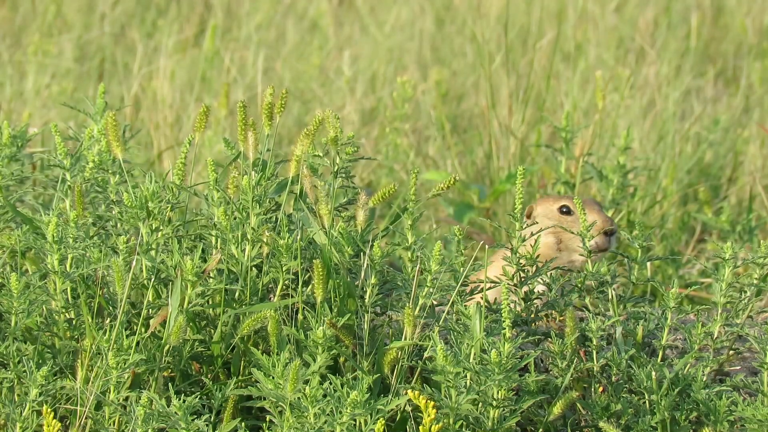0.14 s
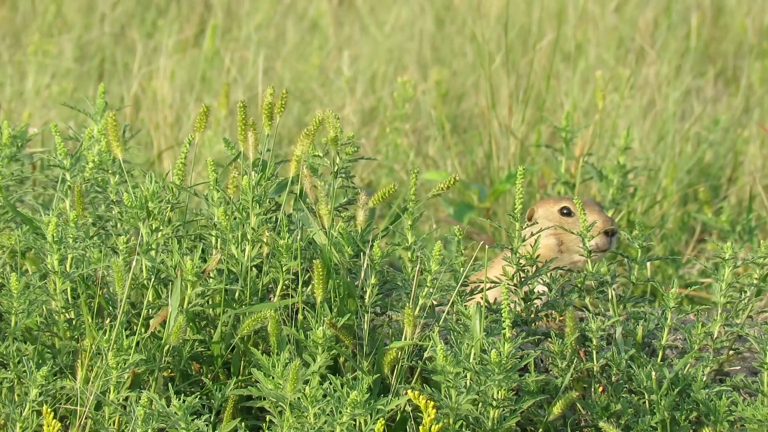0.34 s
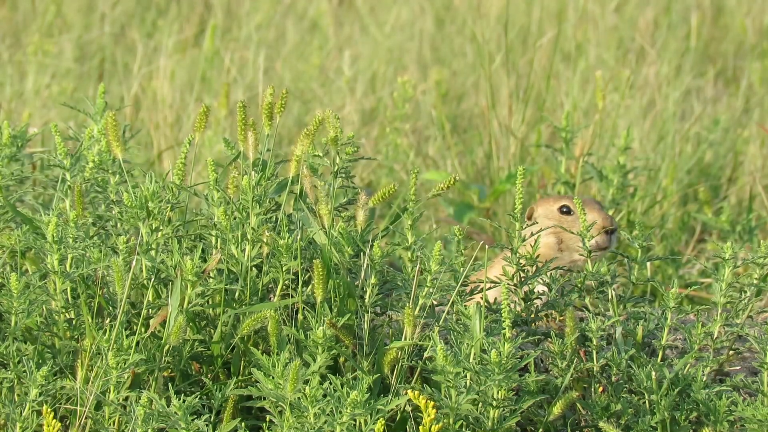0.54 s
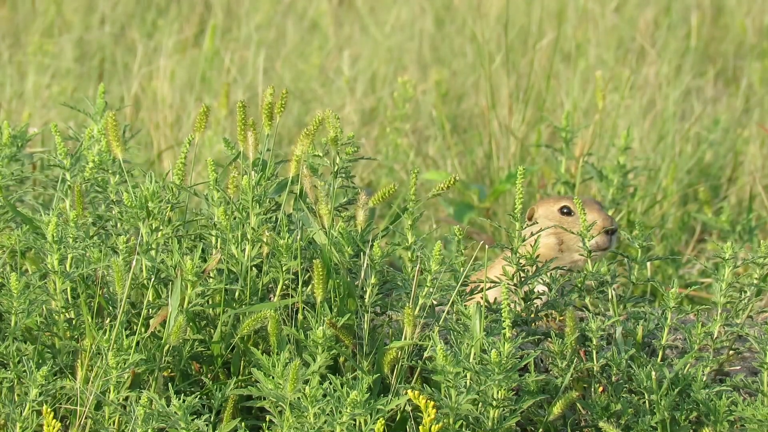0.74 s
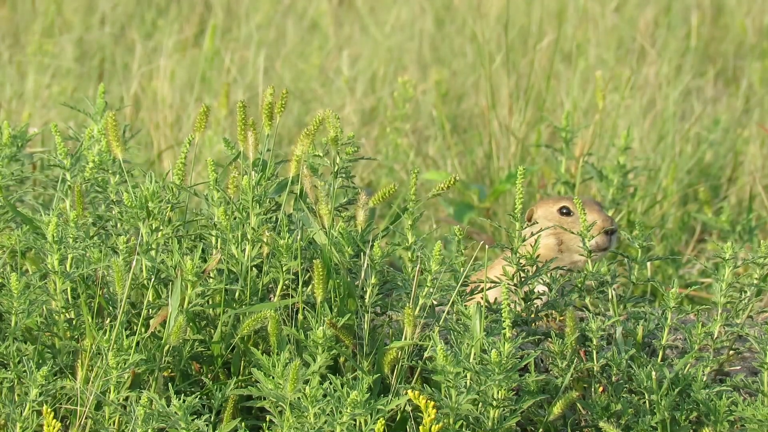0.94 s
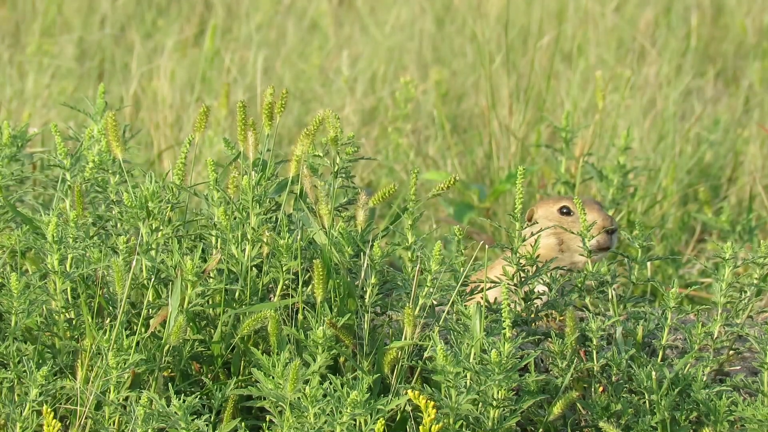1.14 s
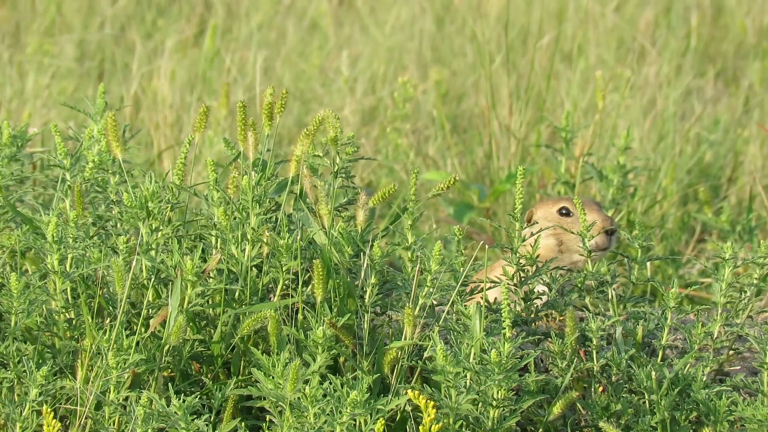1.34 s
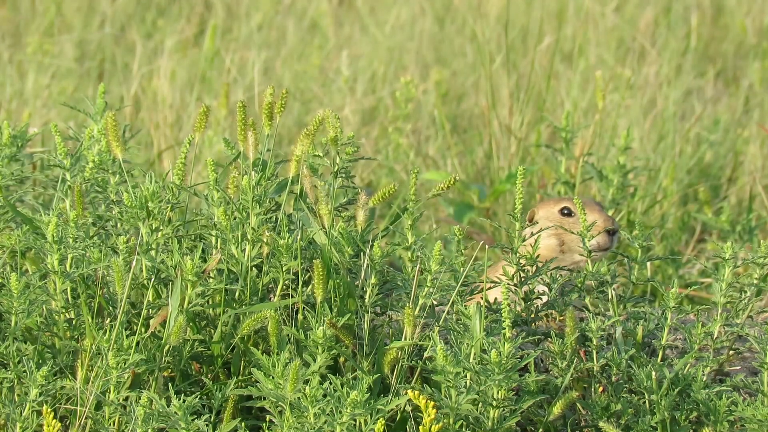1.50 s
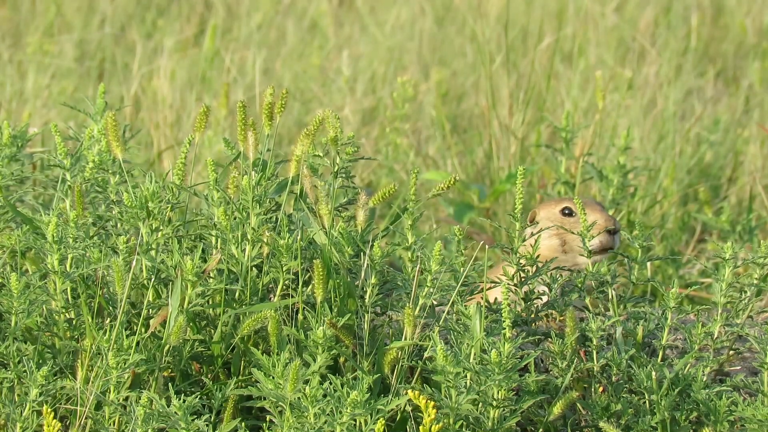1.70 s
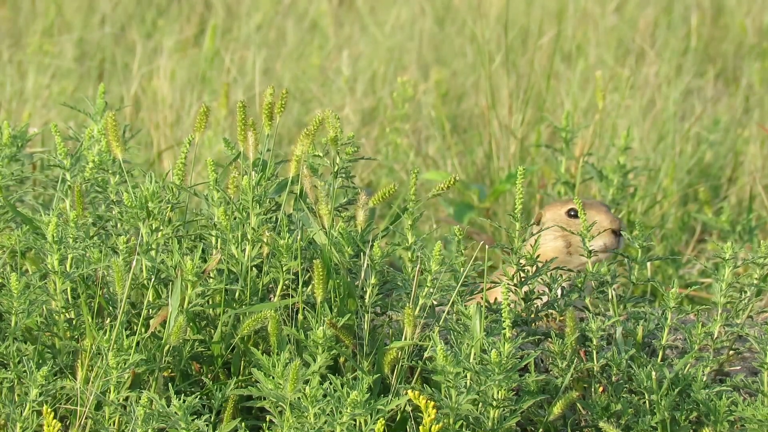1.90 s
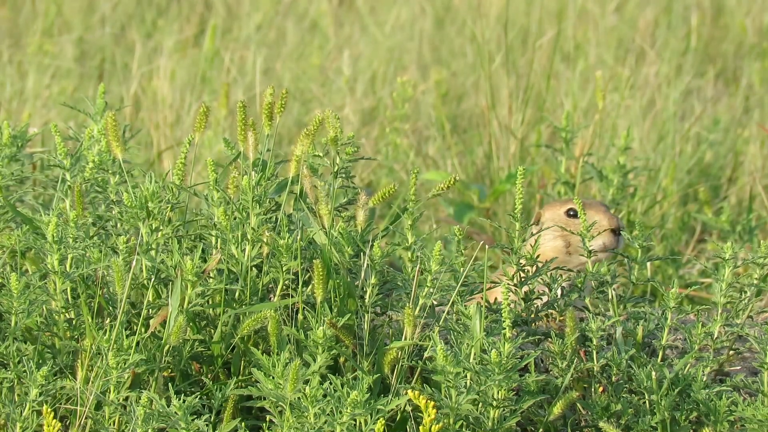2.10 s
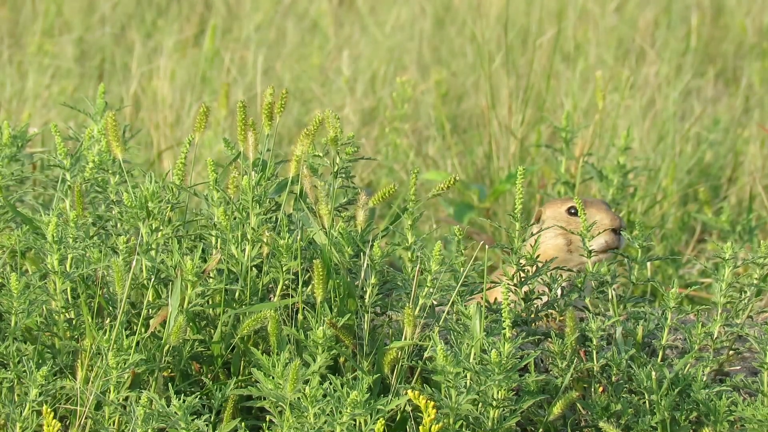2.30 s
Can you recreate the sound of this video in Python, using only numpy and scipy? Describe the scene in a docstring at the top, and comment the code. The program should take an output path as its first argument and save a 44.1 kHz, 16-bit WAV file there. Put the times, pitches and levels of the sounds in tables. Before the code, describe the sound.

A prairie dog barks five quick, piercing yips, fairly evenly spaced, in an open meadow. Crickets chirp near and far, high insects trill steadily, grass hisses faintly, and wind softly thumps the microphone near the end.

```python
"""A prairie dog barks five short arched whistles from a meadow, a slower flutter roughening each one.
Crickets chirp near and far, two high insects trill, the field hisses, wind thumps softly on the microphone.
Barks are whistle harmonics with flutter sidebands and rasp; insects are sliding tone pulses;
field and wind are shaped noise, the wind with single low pushes."""
import sys
import numpy as np
from scipy import signal
from scipy.fft import rfft, irfft, next_fast_len
from scipy.io import wavfile
from scipy.ndimage import uniform_filter1d, map_coordinates

SR = 44100
rng = np.random.default_rng(int(sys.argv[2]) if len(sys.argv) > 2 else 0)


def generate_wav(sig):
    """Save sig (samples, or channels by samples) to the path in sys.argv[1] as 16-bit PCM at SR."""
    pcm = np.round(np.clip(np.atleast_2d(sig).T, -1, 1) * 32767).astype(np.int16)
    wavfile.write(sys.argv[1], SR, pcm)


N = 103635

# One contour per bark: time_s, pitch_hz, effort_db, flutter_re_whistle_db
BARKS = [
    [(.195, 1770, -60, -16), (.199, 1878, -40.5, -8), (.207, 2076, -41, -8), (.219, 2078, -37, -25),
     (.23, 2057, -44.5, -2), (.238, 1834, -43, -5), (.244, 1770, -45, -23), (.254, 1370, -49, -6)],
    [(.561, 1774, -75, -26), (.566, 1814, -40, -9.5), (.573, 1994, -40.5, -9), (.583, 1974, -38, -7.5),
     (.597, 1940, -44, -11), (.605, 1805, -39.5, -13), (.609, 1716, -47.5, -14), (.62, 1310, -45, -6)],
    [(.961, 1797, -73, -14), (.966, 1830, -38, -30), (.973, 1915, -40.5, -18), (.985, 1900, -39, -3.5),
     (.997, 1862, -39.5, -18), (1.006, 1793, -41, -3), (1.011, 1720, -48, -20), (1.023, 1350, -47, -9)],
    [(1.292, 1720, -47, 11), (1.296, 1726, -46.5, -5), (1.303, 1858, -40.5, -9.5), (1.312, 1917, -40.5, -6),
     (1.322, 1863, -41, -26), (1.331, 1827, -42, -4), (1.336, 1723, -46.5, -16), (1.346, 1460, -56, -1)],
    [(1.815, 1606, -55, 3), (1.821, 1610, -52.5, -2), (1.828, 1711, -43.5, 0), (1.838, 1732, -37.5, -19),
     (1.846, 1753, -39.5, -16), (1.854, 1718, -40.5, -28), (1.858, 1564, -51.5, -11),
     (1.871, 1310, -56, -9)],
]
# Flutter rate glide, one row per bark: first_hz, last_hz
FLUTTER_RATES = [(465, 420), (445, 250), (441, 289), (359, 253), (389.6, 284)]
# Mouth response: frequency_hz, gain_db
MOUTH = [(1200, 4), (2100, -2.5), (2700, 8.5), (3850, 7.5), (4150, 16), (4500, 0), (5200, -13),
         (6100, -9.5), (7000, -7), (8000, -11.5), (12500, -13), (14200, -25), (15000, -79)]
# Single cricket pulses, near and right: middle_s, level_db
NEAR_PULSES = [(.082, -41), (.125, -41.5), (.174, -40), (.952, -39.5), (.999, -41.5), (1.468, -40),
               (1.512, -39), (1.564, -39), (1.968, -39.5), (2.012, -38), (2.061, -38)]
RIGHT_PULSES = [(.322, -51.5), (.368, -48), (.404, -48.5), (.784, -52), (.821, -50), (.868, -51.5),
                (1.047, -50), (1.194, -52), (1.232, -53), (1.271, -49), (1.583, -53), (1.631, -49.5),
                (1.674, -50), (2.075, -51), (2.116, -46.5), (2.161, -46.5)]
# Chirps of evenly spaced pulses, low and upper cricket: first_middle_s, level_db
LOW_CHIRPS = [(.271, -54.5), (.686, -54.5), (1.08, -55.5), (1.465, -61), (1.865, -55), (2.27, -53.5)]
UPPER_CHIRPS = [(.472, -53.5), (.755, -60), (1.107, -57.5), (1.601, -54.5), (2.041, -54), (2.25, -57.5)]
# Trill runs of two high insects: first_pulse_s, period_s, until_s, level_db
HIGH_TRILL = [(-.001, .0608, 1.25, -47.5), (1.284, .06, 1.31, -48), (1.461, .0591, 2.38, -48)]
SOFT_TRILL = [(.036, .0578, .52, -53), (1.067, .056, 1.26, -55), (1.37, .058, 2.09, -51)]
# Pulse form of each insect: top_hz, rise_hz, fall_hz, before_top_s, after_top_s, overtone_db,
# left_minus_right_db, left_lead_rad
NEAR_SONG = (4880, 25, 500, .011, .016, -30, 1.7, .87)
RIGHT_SONG = (4700, 0, 420, .016, .012, -45, -2, -1.2)
LOW_SONG = (4420, 0, 520, .02, .012, -45, 1.5, .9)
HIGH_SONG = (8100, 550, 1700, .014, .019, -60, 1.3, 2.0)
SOFT_SONG = (7760, 50, 350, .012, .012, -60, 1, 2)
# Distant insect groups: top_hz, spread_hz, fall_hz, group_pulses_per_s, level_db
CHORUS = [(4750, 300, 420, 110, -60), (8050, 400, 700, 90, -64)]
# Field noise spectra, mid and side: frequency_hz, relative_density_db_per_hz
FIELD_MID = [(76, -30), (130, -4), (700, -4), (905, -9), (985, -5), (1080, -10.5), (3300, -18), (4100, -15),
             (4660, -11), (5300, -18), (6290, -24), (7100, -17), (7840, -10.5), (8500, -18), (9200, -34),
             (15500, -62)]
FIELD_SIDE = [(76, -56), (130, -7), (202, 0.5), (468, -1.5), (771, -8), (3740, -24), (4570, -20),
              (6290, -32), (7100, -22), (7840, -13), (8840, -24), (9390, -37.5), (15500, -31.5)]
# Wind strength: time_s, rumble_db
WIND = [(0, -56.5), (.07, -69), (.4, -84), (.5, -64), (.95, -62), (1.14, -77), (1.28, -57), (1.47, -60),
        (1.7, -45.5), (1.83, -53.5), (1.93, -44.5), (2.02, -59), (2.12, -40.5), (2.35, -56.5)]
# Wind spectrum: frequency_hz, relative_density_db_per_hz
RUMBLE = [(15, -3.5), (48, -3.5), (70, -0.5), (140, -25.5), (220, -71)]
# Wind pushes: time_s, drive_db
THUMPS = [(0.888, -48), (1.398, -46), (1.771, -48.5), (1.934, -44), (2.078, -28), (2.096, -33),
          (2.127, -41), (2.186, -42), (2.249, -41.5)]

FLUTTER_WAVER_HZ = 88.6
LOWER_SIDEBAND_DB, FURTHER_SIDEBAND_DB = -10.5, -13.5
FLUTTER_DB_PER_OCTAVE = 6.5  # zero at the second harmonic
UPPER_DB_PER_HARMONIC = -3.5  # above the third
SOFT_DULLING = 0.47  # dB lost per harmonic above the second, per dB of lost effort
RASP_DB, RASP_TILT_DB_PER_OCTAVE = -7, 5.5
PITCH_JITTER, SOFT_JITTER_PER_DB = .003, .0028  # fraction of pitch; gain per dB of lost effort
SHIMMER_DB = .45  # per harmonic number, three times that per sideband step
GRASS_T60_S, GRASS_DB = .06, -17
LOW_GAP_S, UPPER_GAP_S, UPPER_HZ = .0505, .042, 5030
MID_DB, SIDE_DB = -56.5, -51
THUMP_S, LEFT_EARLY_S, LEFT_DB = .0019, .0024, -3.7
TOP_HZ = 15630


def amp(db):
    """Decibels to amplitude."""
    return 10 ** (np.asarray(db) / 20)


def unit(x):
    """Scale to rms 1."""
    return x / np.sqrt(np.mean(x ** 2) + 1e-20)


def along(points, hz):
    """Interpolate (Hz, value) points on a log frequency axis."""
    f, v = np.transpose(points)
    return np.interp(np.log(hz + 1), np.log(f + 1), v)


def wobble(rate_hz, size):
    """Smooth random curve with rate_hz knots a second."""
    knots = rng.standard_normal(int(size * rate_hz / SR) + 4)
    return map_coordinates(knots, [np.arange(size) * rate_hz / SR])


def filtered(x, response):
    """Multiply the spectrum of x by a response of frequency."""
    m = next_fast_len(N + 8192)
    return irfft(rfft(x, m) * response(np.fft.rfftfreq(m, 1 / SR)), m)[..., :N]


def rush(spectrum, patchy_db):
    """Coloured noise of rms 1 with time-frequency patches of random gain."""
    z = signal.stft(rng.standard_normal(N), nperseg=512)[2]
    patches = uniform_filter1d(rng.standard_normal(z.shape), 5, 0)
    patches = uniform_filter1d(patches, 8, 1)
    x = signal.istft(z * amp(patchy_db * unit(patches)), nperseg=512)[1][:N]
    return unit(filtered(x, lambda hz: amp(along(spectrum, hz))))


def rasp(whistle_phase, flutter_phase):
    """Breath noise pulsed by whistle and flutter, through the mouth above 1500 Hz."""
    size = len(whistle_phase)
    noise = amp(RASP_DB) * rng.standard_normal(size)
    noise = noise * (1 + np.cos(whistle_phase)) * (1 + .5 * np.cos(flutter_phase))

    def response(hz):
        tilt_db = RASP_TILT_DB_PER_OCTAVE * np.log2((hz + 1) / 4000)
        return amp(along(MOUTH, hz) + tilt_db) * (hz > 1500)

    return filtered(np.pad(noise, (0, N - size)), response)[:size]


def barks():
    """Harmonics of the whistle, split into sidebands by the flutter, with rasp, through the mouth."""
    out, span = np.zeros(N), SR // 10
    for rows, (first_hz, last_hz) in zip(BARKS, FLUTTER_RATES):
        s, *cols = np.transpose(rows)
        start = round(s[0] * SR)
        t = (start + np.arange(span)) / SR
        pitch_hz, effort_db, flutter_db = [uniform_filter1d(np.interp(t, s, c), size=90) for c in cols]
        flutter_hz = np.interp(t, s[[0, -1]], [first_hz, last_hz])
        flutter_hz = flutter_hz + FLUTTER_WAVER_HZ * wobble(258.6, span)
        lost_db = effort_db.max() - effort_db
        jitter = (PITCH_JITTER + SOFT_JITTER_PER_DB * lost_db) * wobble(495, span)
        whistle_phase = 2 * np.pi * np.cumsum(pitch_hz * (1 + jitter)) / SR
        flutter_phase = 2 * np.pi * np.cumsum(flutter_hz) / SR
        voice = rasp(whistle_phase, flutter_phase)
        for k in range(1, 9):
            harmonic_db = -max(k - 2, 0) * SOFT_DULLING * lost_db + max(k - 3, 0) * UPPER_DB_PER_HARMONIC
            for j in range(-2, 3):  # 0 is the harmonic itself
                db = harmonic_db + along(MOUTH, k * pitch_hz + j * flutter_hz)
                if j:
                    db = db + flutter_db + FLUTTER_DB_PER_OCTAVE * np.log2(k / 2)
                    db = db + (abs(j) - 1) * FURTHER_SIDEBAND_DB + (j < 0) * LOWER_SIDEBAND_DB
                db = db + SHIMMER_DB * (k + 3 * abs(j)) * wobble(261.0, span)
                phase = k * whistle_phase + j * flutter_phase + rng.uniform(0, 2 * np.pi)
                voice += np.sqrt(2) * amp(db) * np.sin(phase)
        fade = np.clip(np.minimum((t - s[0]) / .002, (s[-1] - t) / .009), 0, 1) ** 2
        out[start:start + span] += amp(effort_db) * fade * voice
    return out


def grass(x):
    """Short scattered answer of grass and ground: a decaying noise tail per channel."""
    t = np.arange(SR // 8) / SR
    tail = rng.standard_normal((2, len(t))) * amp(-60 * t / GRASS_T60_S)
    return signal.fftconvolve(x[None], tail / np.linalg.norm(tail[0]), axes=1)[:, :N]


def insect(pulses, song):
    """Each wing stroke is a tone that arches over its top, or only slides down if rise_hz is 0."""
    top_hz, rise_hz, fall_hz, before_s, after_s, overtone_db, pan_db, lead_rad = song
    pad = SR // 4
    out = np.zeros((2, N + SR))
    side = np.array([[.5], [-.5]])  # left, right
    u = np.r_[np.linspace(-1, 0, round(before_s * SR)), np.linspace(0, 1, round(after_s * SR))]
    if rise_hz:
        drop_hz = np.where(u < 0, rise_hz, fall_hz) * u * u
    else:
        drop_hz = fall_hz * (u + 1) ** 2 / 4
    variations = rng.standard_normal((len(pulses), 3))
    for (s, db), (pitch_var, level_var, phase_var) in zip(pulses, variations):
        pitch_hz = top_hz * (1 + .003 * pitch_var) - drop_hz
        phase = 2 * np.pi * np.cumsum(pitch_hz) / SR + 7 * phase_var + lead_rad * side
        tone = np.sin(phase) + amp(overtone_db) * np.sin(2 * phase)
        shape = np.cos(np.pi * u / 2) ** .8 * amp(wobble(300, len(u)))
        gain = amp(db + 1.2 * level_var + pan_db * side)
        first = pad + round((s - before_s) * SR)
        out[:, first:][:, :len(u)] += gain * shape * tone
    return out[:, pad:pad + N]


def chirps(rows, gap_s, count):
    """A group of count evenly spaced pulses from each start."""
    return [(s + k * gap_s, db) for s, db in rows for k in range(count)]


def trill(runs):
    """Evenly spaced pulses through each run."""
    return [(s, db) for first, period, until, db in runs for s in np.arange(first, until, period)]


def chorus(count=12):
    """Faint distant insects, each with its own pitch and side, pulsing at random times."""
    out = 0
    for top_hz, spread_hz, fall_hz, rate, db in CHORUS:
        places = rng.standard_normal((count, 2))
        for offset, (pan, lead) in zip(np.linspace(-1, 1, count), places):
            times = rng.uniform(0, N / SR, round(rate * N / SR / count))
            song = (top_hz + spread_hz * offset, 0, fall_hz, .014, .011, -60, 2 * pan, 1.4 * lead)
            out = out + insect([(s, db) for s in times], song)
    return out


def field():
    """Distant chorus, leaves and air as wide noise, the side stronger than the mid."""
    mid = amp(MID_DB) * rush(FIELD_MID, patchy_db=2.0)
    side = amp(SIDE_DB) * rush(FIELD_SIDE, patchy_db=1.5)
    return np.array([mid + side, mid - side])


def wind():
    """Lumpy rumble and single low pushes, reaching the left channel first and softer."""
    t = np.arange(N + SR // 10) / SR
    s, db = np.transpose(WIND)
    level_db = np.interp(t[:N], s, db) + 2.1 * wobble(13.7, N)
    rumble = amp(level_db) * rush(RUMBLE, patchy_db=0)
    right = np.pad(rumble, (0, SR // 10))
    for s, db in THUMPS:
        u = (t - s) / THUMP_S
        right += amp(db) * (1 - u * u + .5 * u) * np.exp(-u * u / 4.4)
    right = signal.sosfilt(signal.butter(2, 26, 'high', fs=SR, output='sos'), right)
    left = amp(LEFT_DB) * right[round(LEFT_EARLY_S * SR):][:N]
    left_only = amp(-65) * rush(RUMBLE, patchy_db=4.5)
    return np.array([left + left_only, right[:N]])


def scene():
    """Barks and their grass answer, the insects, field and wind."""
    bark = barks()
    choir = [(NEAR_PULSES, NEAR_SONG),
             (RIGHT_PULSES, RIGHT_SONG),
             (chirps(LOW_CHIRPS, LOW_GAP_S, count=2), LOW_SONG),
             (chirps(UPPER_CHIRPS, UPPER_GAP_S, count=3), (UPPER_HZ, *RIGHT_SONG[1:])),
             (trill(HIGH_TRILL), HIGH_SONG),
             (trill(SOFT_TRILL), SOFT_SONG)]
    insects = sum(insect(pulses, song) for pulses, song in choir)
    return bark + amp(GRASS_DB) * grass(bark) + insects + chorus() + field() + wind()


def record(dry):
    """Band limit: nothing passes from TOP_HZ up."""
    return filtered(dry, lambda hz: hz < TOP_HZ)


dry = scene()
out = record(dry)
generate_wav(out)
```